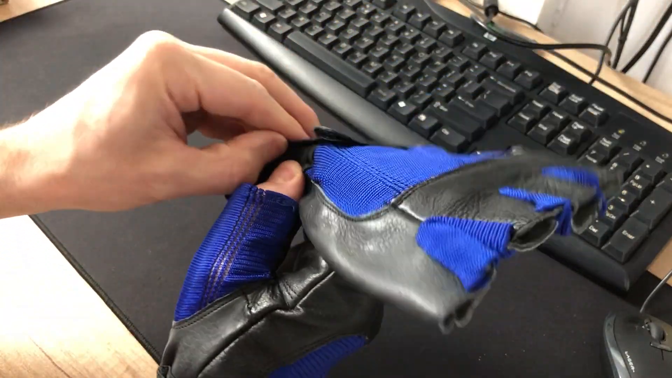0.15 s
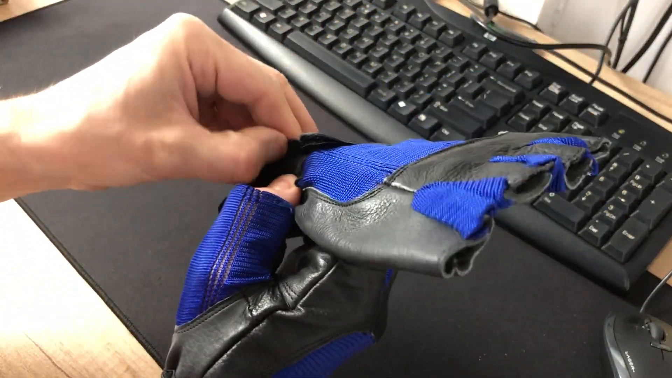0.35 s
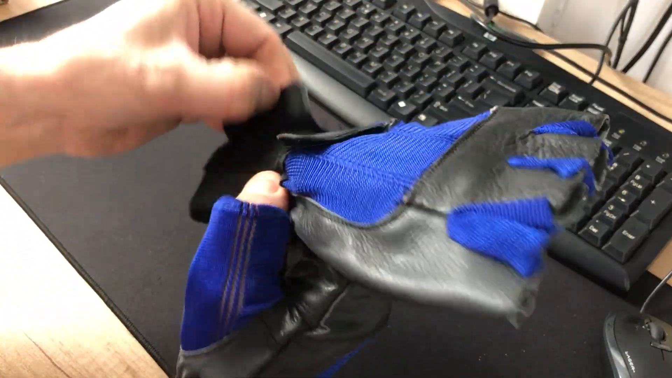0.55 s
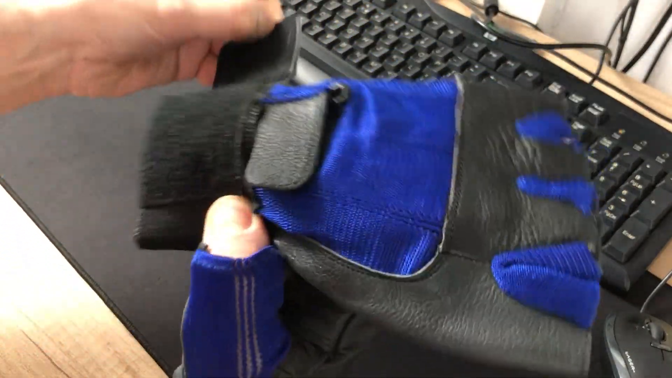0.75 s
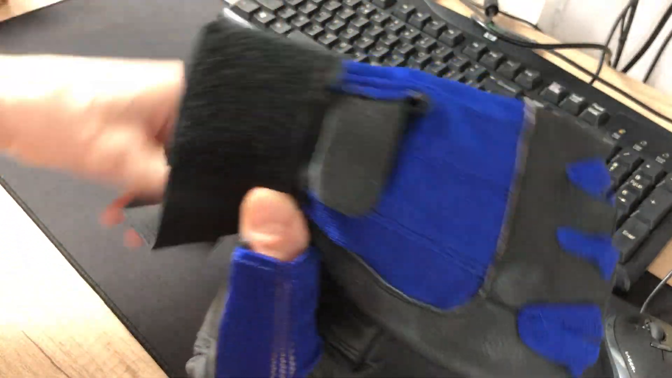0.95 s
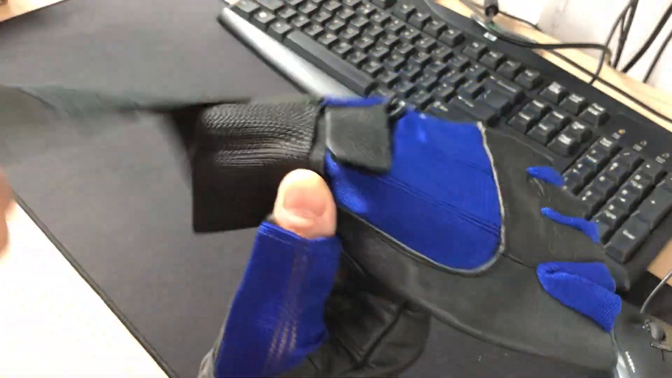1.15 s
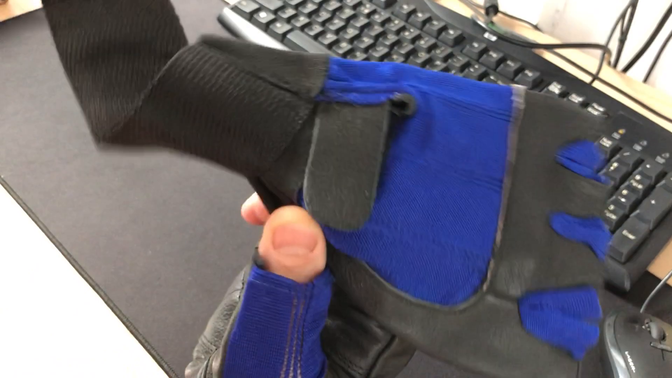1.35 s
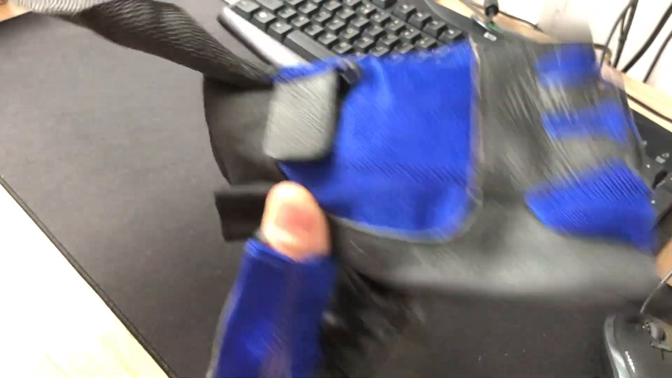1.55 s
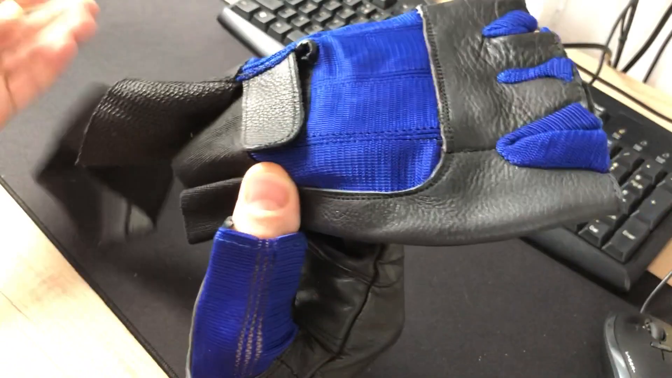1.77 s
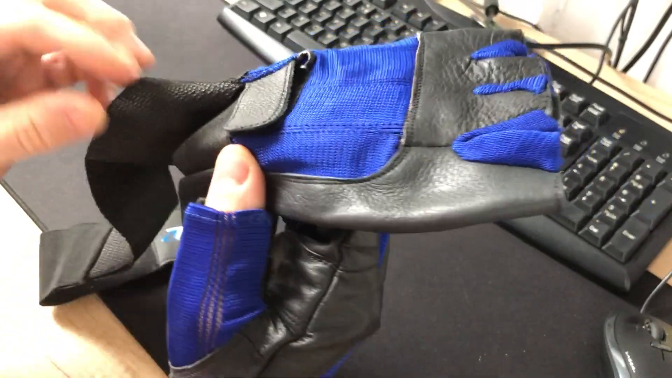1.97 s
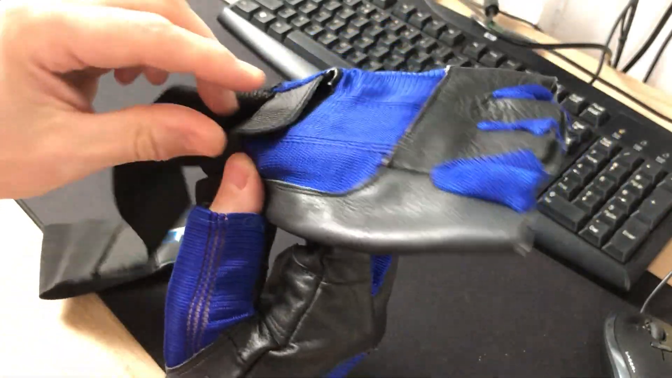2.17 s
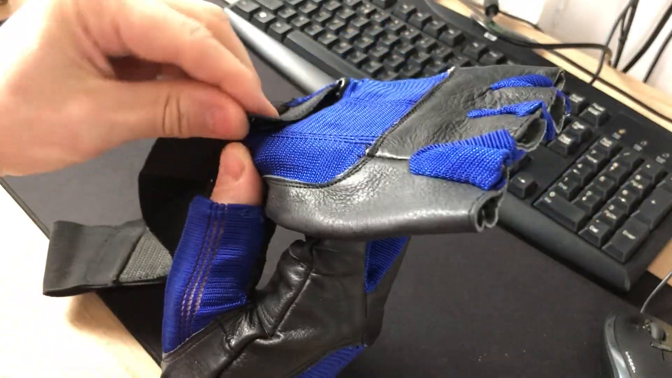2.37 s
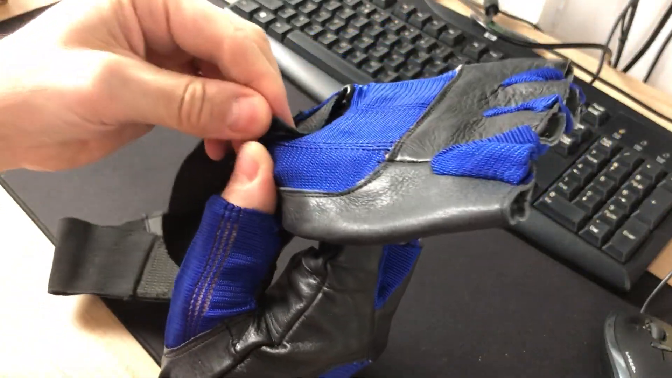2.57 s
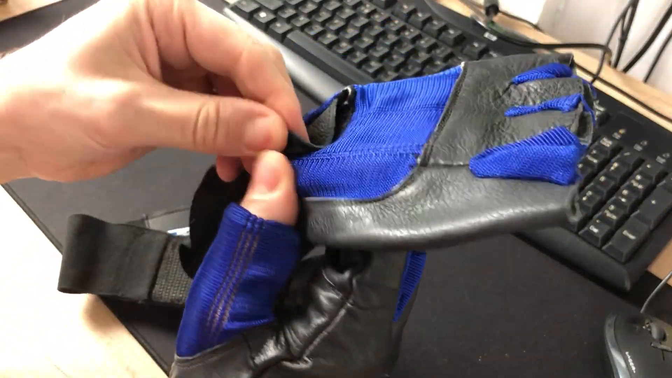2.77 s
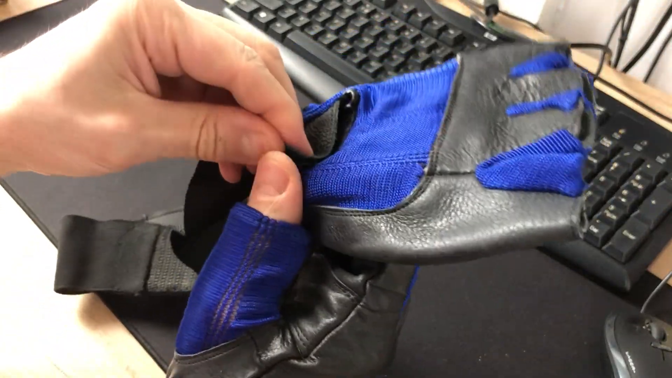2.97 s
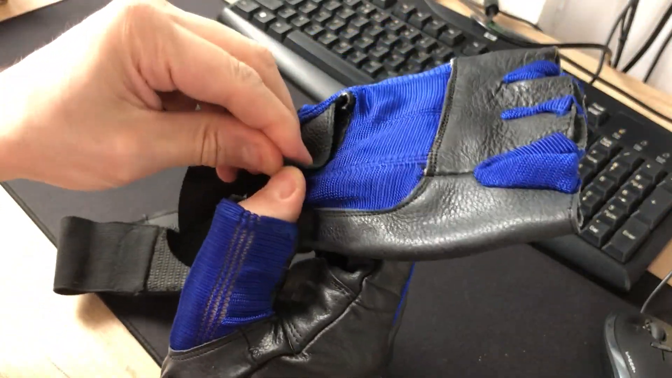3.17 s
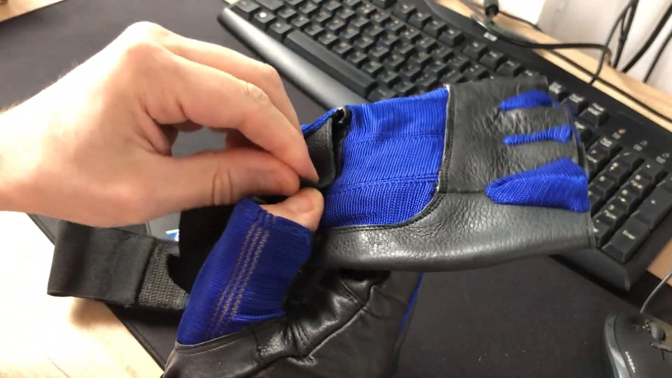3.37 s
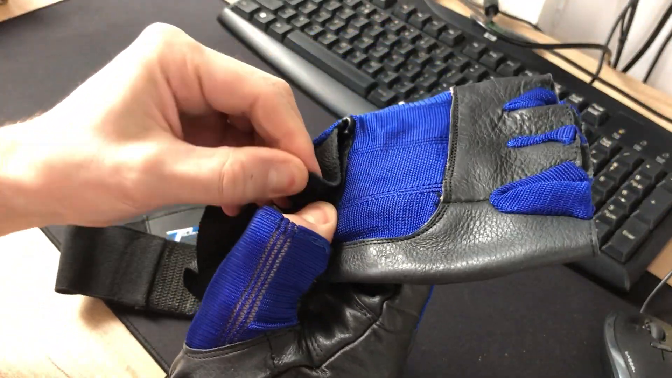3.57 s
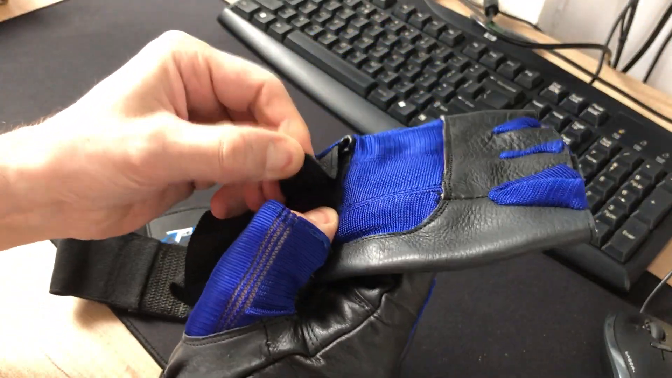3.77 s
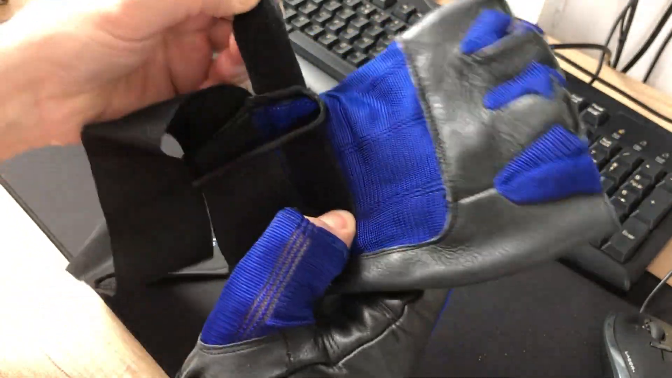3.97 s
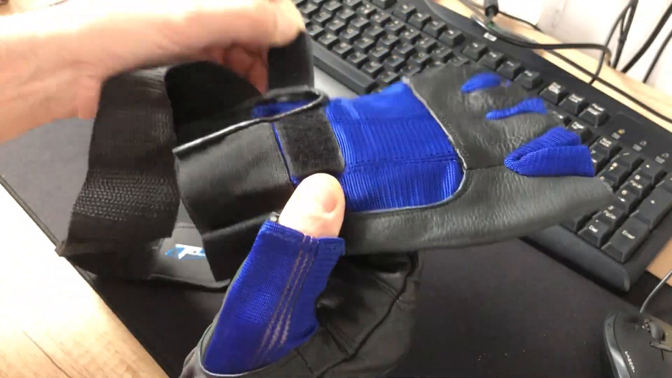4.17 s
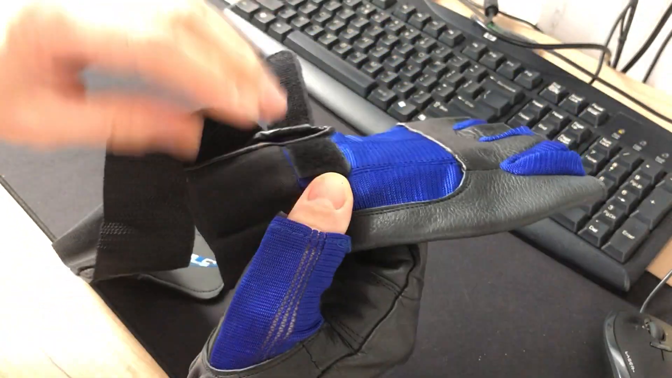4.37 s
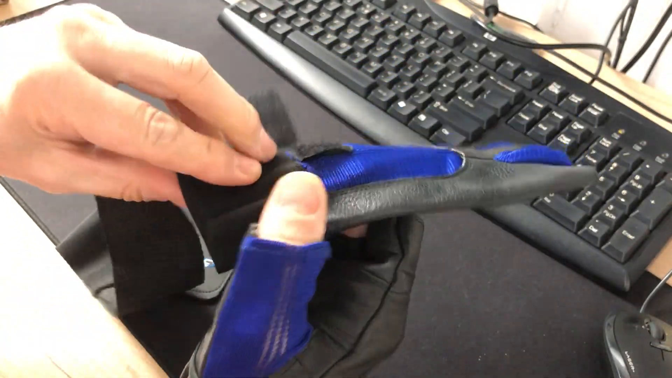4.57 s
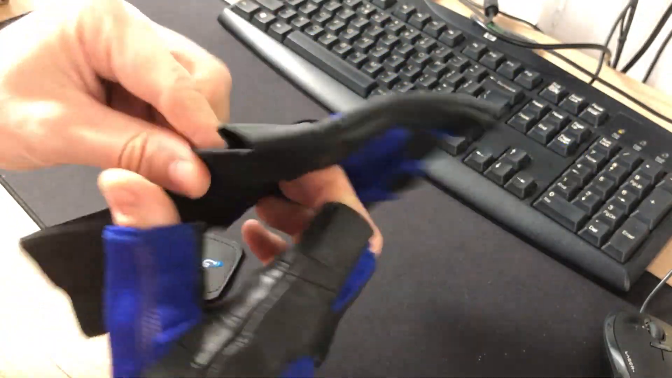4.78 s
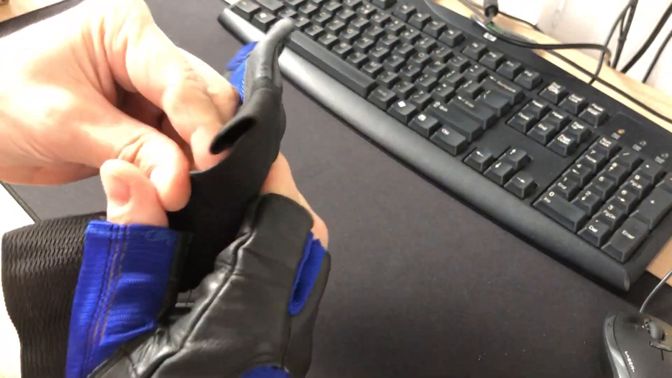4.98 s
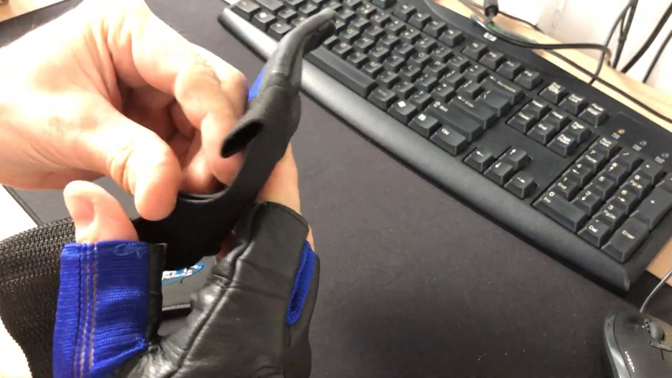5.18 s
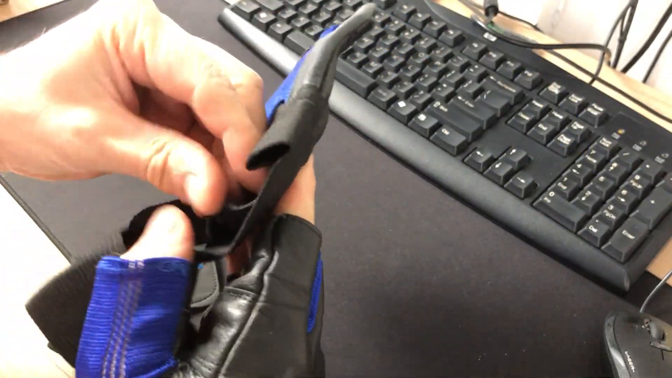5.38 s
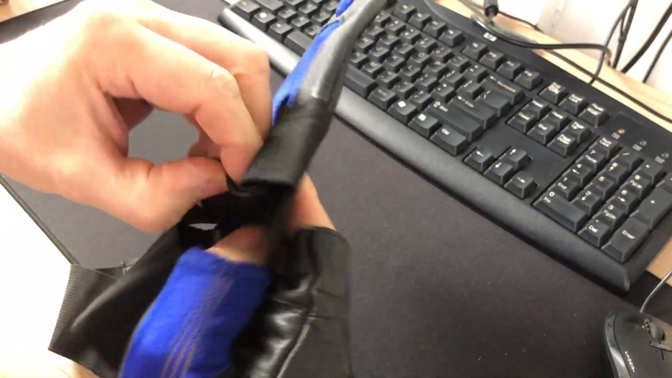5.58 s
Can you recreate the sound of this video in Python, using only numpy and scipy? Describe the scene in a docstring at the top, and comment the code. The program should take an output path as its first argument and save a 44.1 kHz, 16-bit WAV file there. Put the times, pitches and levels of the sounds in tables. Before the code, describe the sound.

A hook-and-loop strap on a leather glove is ripped open twice, crackling sharply, with soft rubbing and a flapping strap in a quiet room.

```python
"""In a small quiet room with a computer hum, fingers rub a leather glove, close by, in random clicks.
From 0.1 s its hook-and-loop wrist strap rips: hooks snap singly, then in bunches, then in tearing runs.
The strap flaps as this rip ends, and while the webbing rasps out in grains from 0.9 s; its end slaps the desk at 1.7 s.
Rubbing returns on and off, with creases popping (noise bursts) and stray hooks ticking (click clusters).
At 3.3 s the rubbing pauses for a second rip, flapping late in it; then it goes on. Echoes are decaying noise."""
import sys
import numpy as np
from scipy import signal
from scipy.io import wavfile
from scipy.ndimage import uniform_filter1d

SR = 44100
rng = np.random.default_rng(int(sys.argv[2]) if len(sys.argv) > 2 else 0)


def bounce(signal):
    """Save signal as a 16-bit WAV file at the path given by the first command-line argument."""
    frames = np.transpose(np.atleast_2d(signal))
    limited = np.clip(frames, -1, 1)
    pcm = np.round(limited * 32767).astype(np.int16)
    wavfile.write(sys.argv[1], SR, pcm)


N = 248283
TIME = np.arange(N) / SR

# Levels in tables and settings are relative: layer gains, filters and the room follow.

# Room noise spectrum: (frequency [Hz], level [dB])
FLOOR_SPECTRUM = [(25, -26.5), (50, -5.5), (85, -6), (150, -7), (220, -6.5), (330, -11.5), (550, -14.5),
                  (1000, -20.5), (2000, -22), (4000, -27.5), (12000, -35), (16000, -46)]
# Computer hum lines: (frequency [Hz], rms level [dB])
HUM_LINES = [(91, -78), (119.5, -71)]
# Room tail decay: (frequency [Hz], t60 [s])
ROOM_DECAY = [(150, 0.45), (600, 0.56), (2500, 0.43), (6000, 0.38), (11000, 0.27), (16000, 0.28)]
EARLY_T60_S, ECHO_DELAY_S = 0.075, 0.005
EDGE_HZ = 16200  # upper band limit

# Fingers rubbing the glove: (start [s], length [s], leather level [dB], knit level [dB])
RUBS = [(0, .04, -63.5, -55.5), (0.064, 0.015, -62, -65), (0.121, 0.046, -58.5, -61.5),
        (1.707, 0.12, -65.5, -66.5), (1.868, 0.018, -54, -61), (2.004, 0.034, -58, -51),
        (2.128, 0.017, -59, -57.5), (2.22, 0.19, -71, -62.5), (2.343, 0.14, -66.5, -59),
        (2.56, 0.13, -83, -62.5), (2.762, 0.1, -67.5, -61), (2.945, 0.095, -66.5, -65.5),
        (3.029, 0.037, -60.5, -57.5), (3.106, 0.11, -65.5, -62.5), (3.237, 0.13, -72, -62),
        (4.034, 0.2, -66, -63.5), (4.466, 0.077, -62.5, -61), (4.58, 0.26, -63.5, -60.5),
        (4.881, 0.073, -65, -61), (4.993, .125, -66, -63), (5.145, 0.052, -66, -62.5),
        (5.285, 0.039, -65, -64), (5.362, 0.073, -61.5, -61), (5.524, 0.21, -66.5, -63)]
RUB_ATTACK_S, RUB_RELEASE_S = 0.02, 0.034
GRIP_DB = -75.5  # the glove never lies quite still in the hand
# Rubbed leather spectrum: (frequency [Hz], level [dB])
LEATHER_SPECTRUM = [(150, -5), (550, -2.5), (1000, -4), (2800, -4.5), (4500, -7), (8000, -19)]
# Rubbed knit spectrum: (frequency [Hz], level [dB])
KNIT_SPECTRUM = [(2000, -32.5), (5000, -3), (8000, -3.5), (12300, -2), (13600, -6.5), (16000, -8)]
KNIT_SPREAD_DB = 4
# Stray hooks catching: (time [s], level [dB])
CATCHES = [(1.5084, -31), (1.592, -24), (2.202, -41), (2.418, -38), (2.592, -39), (2.609, -38),
           (2.627, -39), (2.6694, -28), (2.795, -39), (3.2908, -40.5), (4.2172, -34), (4.2304, -34),
           (5.1144, -42.5)]
# Stray hook spectrum: (frequency [Hz], level [dB])
CATCH_SPECTRUM = [(500, -35), (2000, -13), (5000, -8), (9000, -2.5), (12000, 3), (16000, -1)]
# Leather creasing: (time [s], level [dB])
CREASES = [(1.903, -43), (3.202, -33.5), (4.098, -38.5), (4.681, -42.5), (4.724, -40), (4.8, -42.5),
           (5.417, -47), (5.578, -43)]
# Crease spectrum: (frequency [Hz], level [dB])
CREASE_SPECTRUM = [(150, 9), (500, 3.5), (1200, 3.5), (3000, 9.5), (5000, -10), (12000, 3), (16000, -20)]

# Strap end hitting the desk: (time [s], slap level [dB], desk thump level [dB])
LANDINGS = [(1.7117, -32.5, -24.5), (1.8799, -37.5, -42), (2.006, -51, -61)]
# Desk thump spectrum: (frequency [Hz], level [dB])
DESK_SPECTRUM = [(40, -28), (80, -20), (120, 7), (190, -6.5), (310, 0), (390, -2), (480, -6.5), (620, 3.5),
                 (760, 2), (880, 0), (1100, 3.5), (1450, -22), (2300, -18), (6000, -46)]
# Desk thump decay: (frequency [Hz], t60 [s])
DESK_DECAY = [(120, 0.29), (600, 0.24), (1100, 0.13), (3000, 0.24)]
# Strap slap spectrum: (frequency [Hz], level [dB])
SLAP_SPECTRUM = [(100, -21), (400, -9), (800, 6), (1200, 0), (2000, -5.5), (4000, -8.5), (8000, -15.5),
                 (16000, -16)]

# Loose strap flapping taut: (time [s], level [dB], starting pitch [Hz])
FLAPS = [(.678, -44.5, 856), (.953, -63, 400), (1.04, -52, 765), (1.166, -54.5, 340), (1.428, -48, 570),
         (1.467, -47, 810), (1.712, -42, 936), (2.006, -47.5, 895), (3.835, -39.5, 396),
         (3.848, -37.5, 908), (3.866, -44, 663), (4.728, -56, 347)]
FLAP_RISE_S, FLAP_FALL_S, FLAP_END_HZ = 0.0047, 0.007, 130

# Strokes of the webbing through its ring: (start [s], length [s], level [dB])
SLIDES = [(0.924, 0.029, -47.5), (0.969, 0.032, -59), (1.013, 0.023, -38), (1.07, .125, -52),
          (1.228, .14, -46.5), (1.372, 0.094, -45.5), (1.488, .05, -55.5), (1.575, 0.048, -49)]
SLIDE_ATTACK_S, SLIDE_RELEASE_S = 0.033, 0.021
# Webbing spectrum: (frequency [Hz], level [dB])
WEBBING_SPECTRUM = [(59, -5), (100, 0), (365, -4.5), (492, -5), (547, 1.5), (705, -3), (2420, -5),
                    (2630, -5), (3700, -4), (4290, -5.5), (9410, -4), (12400, -4), (16000, -12.5)]

# Hand tugging at the strap, a low tremble: (start [s], length [s], level [dB])
TUGS = [(0.15, 0.048, -55.5), (3.48, 0.032, -57.5), (3.842, .04, -51)]
TUG_EDGE_S = 0.015
# Hand and glove trembling under the pull: (frequency [Hz], level [dB])
SHAKE_SPECTRUM = [(25, -17), (50, -5), (75, 6), (110, -8.5), (200, -17), (600, -46.5), (3000, -77.5)]

# Single hooks and small bunches snapping: (time [s], energy as if spread over 1 ms [dB])
SNAPS = [(0.0983, -33), (0.1133, -26), (0.133, -23), (0.1905, -24.5), (.2111, -31), (0.2291, -23),
         (0.2817, -29.5), (.31, -26), (0.3771, -18), (.382, -16.5), (0.399, -19), (0.4033, -17),
         (0.4099, -22), (0.4278, -21), (0.4317, -17.5), (0.4407, -25), (0.4511, -12), (.6179, -16),
         (3.3342, -32), (3.3486, -24.5), (3.4224, -30.5), (3.458, -25), (3.4707, -20), (3.4921, -26.5),
         (3.499, -27), (3.5338, -21.5), (3.6019, -42.5), (3.6196, -19.5), (3.6327, -21.5), (3.6504, -13.5),
         (3.672, -22.5), (3.682, -13), (3.69, -18), (3.6965, -18.5), (3.7137, -15), (3.7242, -18.5),
         (3.7452, -27.5), (3.7589, -20.5), (3.7728, -9.5), (3.79, -19), (3.8, -8.5), (3.8032, -11)]
# A louder snap frees more hooks and lasts longer.
SNAP_S, SNAP_AT_DB, DB_PER_DOUBLING = 0.00065, -23, 11.5
# A snap strains the hooks beside it, which slip just before or after: offset up to +-NEIGHBOUR_S.
NEIGHBOUR_DB, NEIGHBOUR_S, NEIGHBOUR_SPREAD_DB = -13.5, 0.0035, 3.5
# Tearing runs, bunch after bunch: (start [s], length [s], mean level of a bunch [dB])
RUNS = [(.32, .031, -22.5), (.471, 0.055, -18), (.546, 0.14, -15), (3.513, 0.012, -21), (3.566, .015, -24),
        (3.704, 0.008, -17), (3.806, 0.056, -16.5)]
BUNCHES_PER_S, RUN_BUNCH_S = 175, 0.0022  # each bunch lasts 0.5 to 2 times RUN_BUNCH_S
BUNCH_SPREAD_DB, BUNCH_JITTER = 4, 0.8  # +- level; +- share of half a row's time slot
RUN_CRACKLE_DB, RUN_EDGE_S = -12, 0.0073  # fine crackle, relative to the bunches
# Loops dragged through the hooks, one curve per rip: (time [s], level [dB])
DRAG_CURVES = [
    [(.09, -70.5), (.14, -48.5), (.22, -61), (.30, -56.5), (.34, -40), (.46, -47.5), (.53, -30.5),
     (.68, -31.5), (.70, -40.5)],
    [(3.33, -57), (3.41, -65), (3.48, -45), (3.53, -47), (3.60, -72), (3.70, -35), (3.74, -65),
     (3.87, -24.5), (3.89, -66)],
]
# Strap hanging free: (time [s], share [0 pinched tight .. 1 slack])
FREE_SHARE = [(.09, .62), (.33, .88), (.40, .45), (.50, .52), (.57, .9), (.68, .88), (3.33, .45),
              (3.52, .3), (3.58, .06), (3.77, .12), (3.82, .45), (3.87, .7)]
# Hook spectrum, strap pinched: (frequency [Hz], level [dB])
TIGHT_SPECTRUM = [(59, -50), (100, -21.5), (271, -17), (492, -27), (662, -19), (930, -26.5), (1610, -18),
                  (2080, -18.5), (2690, -13.5), (4200, -9), (5650, 2), (7290, -4.5), (12100, -0.5),
                  (13500, -5.5), (16000, 3.5)]
# Hook spectrum, strap slack: (frequency [Hz], level [dB])
SLACK_SPECTRUM = [(59, -54.5), (100, -28), (315, -20.5), (634, -10), (854, -11), (1060, -13.5), (1480, -6),
                  (2000, -7), (2630, -2.5), (4200, -2), (6020, -2.5), (7770, -4), (11900, 1), (13500, 0.5),
                  (16000, -6.5)]


def amp(db):
    """Amplitude ratio of a level in dB."""
    return 10 ** (np.asarray(db) / 20)


def unit_rms(x):
    """Scale to rms 1."""
    return x / np.sqrt(np.mean(x ** 2) + 1e-20)


def unit_ms(x):
    """Scale to the energy of 1 ms at rms 1."""
    return np.sqrt(SR / 1000) * x / np.linalg.norm(x)


def read(points, hz):
    """Interpolate a table on a log frequency axis."""
    f, value = np.transpose(points)
    return np.interp(np.log(hz + 1), np.log(f + 1), value)


def add(mix, start_s, sound):
    """Mix a sound in place at start_s."""
    part = mix[max(round(start_s * SR), 0):][:len(sound)]
    part += sound[:len(part)]


def level(rows):
    """Gain along a dB curve, silent outside it."""
    s, db = np.transpose(rows)
    return amp(np.interp(TIME, s, db)) * (TIME >= s[0]) * (TIME <= s[-1])


def colour(x, spectrum, size=4096):
    """Causal minimum-phase filter of unit energy with the given spectrum."""
    hz = abs(np.fft.fftfreq(size, 1 / SR))
    band_limit = 1 + (hz / EDGE_HZ) ** 40
    log_gain = np.log(amp(read(spectrum, hz)) / band_limit + 1e-5)
    minimum_phase = np.exp(np.conj(signal.hilbert(log_gain)))
    taps = np.fft.ifft(minimum_phase).real[:size // 2]
    return signal.oaconvolve(x, taps / np.linalg.norm(taps))[:N]


def grains(per_s, spread_db):
    """Random clicks of uneven size, rms 1."""
    size = amp(spread_db * np.minimum(rng.exponential(1, N), 4))
    sign = rng.choice([-1, 1], N)
    return unit_rms(size * sign * (rng.random(N) < per_s / SR))


def clumps(smooth_s, depth_db):
    """A gain that wavers as fibres stick and slip, rms 1."""
    size = max(int(smooth_s * SR), 1)
    waver = unit_rms(uniform_filter1d(rng.standard_normal(N), size))
    return unit_rms(amp(depth_db * waver))


def burst(db, t60_s, size=2048):
    """A sudden puff of contact noise, with the energy of 1 ms at db."""
    decay = amp(-60 * np.arange(size) / SR / t60_s)
    return amp(db) * unit_ms(rng.standard_normal(size) * decay)


def dying_noise(decay):
    """Many close modes at once, each band with its own decay time."""
    hz, age, z = signal.stft(rng.standard_normal(SR * 3 // 4), SR, nperseg=256)
    fade = np.exp(-np.log(1000) * age / read(decay, hz)[:, None])
    return signal.istft(z * fade, SR, nperseg=256)[1]


def stroke(start_s, length_s, attack_s, release_s):
    """One movement of the hand: it speeds up, holds, and dies away."""
    age = np.maximum(TIME - start_s, 0)
    fall = np.exp(-np.maximum(age - length_s, 0) / release_s)
    return (1 - np.exp(-2 * age / attack_s)) * fall


def bunch(db, length_s, hooks_per_s=5000, shiver_db=-11, shiver_t60_s=0.025, hook_hz=8500):
    """One hook sets off its neighbours; they twang for an instant and the fabric shivers after them."""
    span = max(int(length_s * SR), 1)
    count = 1 + int(length_s * hooks_per_s)
    place, sign, size = rng.random((3, 64))[:, :count]
    hooks = np.zeros(span)
    index = ((np.arange(count) + place) * span / count).astype(int)
    hooks[index] = np.sign(sign - 0.5) * (1 + size)
    shiver = burst(shiver_db, shiver_t60_s)
    t = TIME[:len(shiver)]
    twang_hz = hook_hz * rng.uniform(0.6, 1.5)
    twang = np.cos(2 * np.pi * twang_hz * t) * np.exp(-t / 0.00012)
    click_and_twang = 0.5 * twang + (t == 0)
    snap = signal.fftconvolve(hooks, click_and_twang)[:len(t)]
    return amp(db) * (unit_ms(snap) + shiver)


def background(floor_db=-71, waver_rad_per_db=0.021):
    """Soft room noise, and a computer's hum lines wavering in phase."""
    hum = np.zeros(N)
    for hz, db in HUM_LINES:
        phase = waver_rad_per_db * 20 * np.log10(clumps(0.3, 8))
        hum += amp(db) * unit_rms(np.sin(2 * np.pi * hz * TIME + phase))
    return hum + amp(floor_db) * unit_rms(colour(rng.standard_normal(N), FLOOR_SPECTRUM))


def handling(leather_db=-0.5, knit_db=-2, catch_db=-10, crease_db=-7):
    """Fingers rub leather and knit as clumped grains; creases pop and stray hooks tick."""
    on_leather, on_knit = np.full((2, N), amp(GRIP_DB))
    for s, length_s, hide_db, cloth_db in RUBS:
        move = stroke(s, length_s, RUB_ATTACK_S, RUB_RELEASE_S)
        on_leather = np.maximum(on_leather, amp(hide_db) * move)
        on_knit = np.maximum(on_knit, amp(cloth_db) * move)
    pressure = clumps(0.093, 1.9)
    leather = on_leather * pressure * grains(5500, 4.3) * clumps(0.019, 2.1)
    knit = on_knit * pressure * grains(11000, KNIT_SPREAD_DB) * clumps(0.012, 2.3)
    ticks, pops = np.zeros((2, N))
    for s, db in CATCHES:
        add(ticks, s, bunch(db + catch_db, 0.00082))
    for s, db in CREASES:
        add(pops, s, burst(db + crease_db, 0.013))
    rubbing = amp(leather_db) * colour(leather, LEATHER_SPECTRUM) + amp(knit_db) * colour(knit, KNIT_SPECTRUM)
    return rubbing + colour(ticks, CATCH_SPECTRUM) + colour(pops, CREASE_SPECTRUM)


def landings(slap_t60_s=0.011):
    """The strap end slaps down and the desk top answers with a dull thump."""
    slaps, thumps = np.zeros((2, N))
    for s, slap_db, desk_db in LANDINGS:
        add(slaps, s, burst(slap_db, slap_t60_s))
        add(thumps, s, amp(desk_db) * unit_ms(dying_noise(DESK_DECAY)))
    return colour(slaps, SLAP_SPECTRUM) + colour(thumps, DESK_SPECTRUM)


def flaps(flutter=0.7):
    """A ripple runs along the strap, its short waves arriving first: a soft thud that falls in pitch."""
    out, t = np.zeros(N), TIME[:SR // 8]
    for s, db, start_hz in FLAPS:
        age = t / FLAP_RISE_S
        swell = age * np.exp(1 - age)
        pitch_hz = FLAP_END_HZ + (start_hz - FLAP_END_HZ) * np.exp(-t / FLAP_FALL_S)
        smooth_noise = uniform_filter1d(rng.standard_normal(len(t)), int(SR / start_hz))
        uneven = 1 + flutter * unit_rms(smooth_noise)
        tone = np.sin(2 * np.pi * np.cumsum(pitch_hz) / SR)
        add(out, s, amp(db) * swell * uneven * tone)
    return out


def slide(slide_db=-1):
    """The weave of the strap rasps as it is drawn out and swung."""
    speed = np.zeros(N)
    for s, length_s, db in SLIDES:
        speed += amp(db + slide_db) * stroke(s, length_s, SLIDE_ATTACK_S, SLIDE_RELEASE_S)
    return colour(speed * grains(14000, 2.8) * clumps(0.0063, 3.1), WEBBING_SPECTRUM)


def tugs():
    """Hand and glove tremble as the pull takes hold or breaks free."""
    effort = np.zeros(N)
    for s, length_s, db in TUGS:
        effort += amp(db) * stroke(s, length_s, TUG_EDGE_S, TUG_EDGE_S)
    return colour(effort * rng.standard_normal(N), SHAKE_SPECTRUM)


def hooks_letting_go(snap_db=-0.5, run_db=-2.0, neighbours=2):
    """Distinct snaps with their neighbours, and runs of bunches that give way row by row at uneven moments."""
    out = np.zeros(N)
    for s, db in SNAPS:
        length_s = SNAP_S * 2 ** ((db - SNAP_AT_DB) / DB_PER_DOUBLING)
        add(out, s, bunch(db + snap_db, length_s))
        for late, size in rng.uniform(-1, 1, (neighbours, 2)):
            neighbour_db = db + NEIGHBOUR_DB + NEIGHBOUR_SPREAD_DB * size
            add(out, s + NEIGHBOUR_S * late, bunch(neighbour_db, SNAP_S))
    for start, length_s, db in RUNS:
        rows = max(round(length_s * BUNCHES_PER_S), 1)
        for k, (late, size, width) in enumerate(rng.uniform(-1, 1, (rows, 3))):
            s = start + (k + 0.5 + 0.5 * BUNCH_JITTER * late) * length_s / rows
            add(out, s, bunch(db + run_db + BUNCH_SPREAD_DB * size, RUN_BUNCH_S * 2 ** width))
    return out


def rip(drag_db=-1, shake_db=-36):
    """Snaps over fine crackle; the sound fills out where the strap is slack enough to radiate."""
    speed = amp(drag_db) * sum(level(rows) for rows in DRAG_CURVES)
    for s, length_s, db in RUNS:
        speed += amp(db + RUN_CRACKLE_DB) * stroke(s, length_s, RUN_EDGE_S, RUN_EDGE_S)
    stick_slip = clumps(0.002, 3)
    hooks = hooks_letting_go() + speed * grains(2200, 4.8) * stick_slip
    free = np.clip(np.interp(TIME, *np.transpose(FREE_SHARE)), 0, 1)
    shake = amp(shake_db) * colour(speed * rng.standard_normal(N), SHAKE_SPECTRUM)
    return colour((1 - free) * hooks, TIGHT_SPECTRUM) + colour(free * hooks, SLACK_SPECTRUM) + shake


def room(x, tail_db=-14.0, early_db=-14, count=3):
    """Echoes off desk and near wall, then the tail; patterns cycle at 4 Hz to stand for the moving glove."""
    out = x.copy()
    for k in range(count):
        tail = dying_noise(ROOM_DECAY)
        t = TIME[:len(tail)]
        tail *= t > 2 * ECHO_DELAY_S
        sparse = rng.standard_normal(len(t)) * (rng.random(len(t)) < 2500 / SR)  # 2500 echoes per s
        early = sparse * (t > ECHO_DELAY_S) * np.exp(-np.log(1000) * t / EARLY_T60_S)
        echoes = amp(tail_db) * tail / np.linalg.norm(tail)
        echoes += amp(early_db) * early / np.linalg.norm(early)
        place = np.sqrt(2 / count) * np.cos(2 * np.pi * (4 * TIME + k / count))
        out += signal.fftconvolve(x * place, echoes)[:N]
    return out


def scene():
    """All glove and strap sounds in the room, over the background."""
    glove = handling() + landings() + flaps() + slide() + tugs() + rip()
    return (room(glove) + background())[None]


def record(dry, ceiling=0.87, low_cut_hz=45):
    """The microphone sheds deep bass and rounds the sharpest peaks; then the band limit."""
    high_pass = signal.butter(2, low_cut_hz, "high", fs=SR, output="sos")
    thinned = signal.sosfilt(high_pass, dry)
    rounded = ceiling * np.tanh(thinned / ceiling)
    low_pass = signal.firwin(255, EDGE_HZ, window=("kaiser", 8), fs=SR)
    return signal.oaconvolve(rounded, low_pass[None], "same")


dry = scene()
out = record(dry)
bounce(out)
```